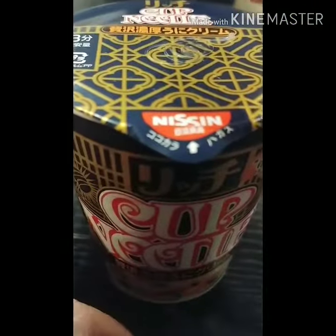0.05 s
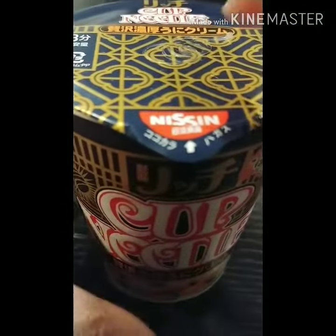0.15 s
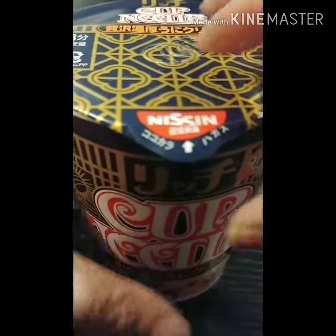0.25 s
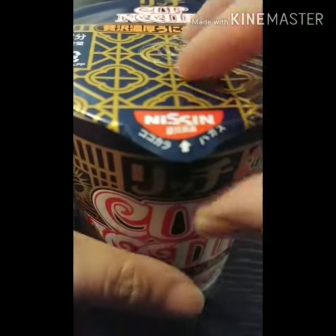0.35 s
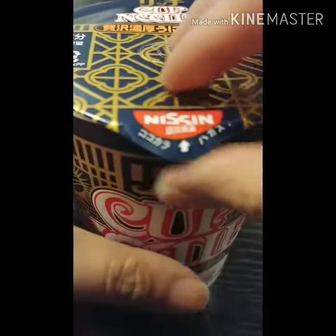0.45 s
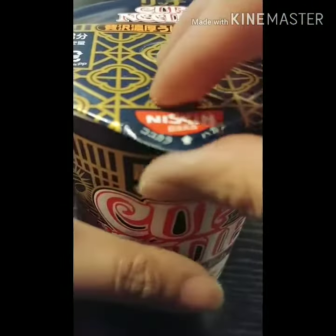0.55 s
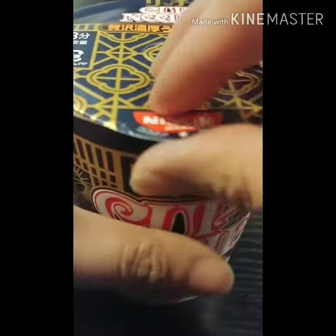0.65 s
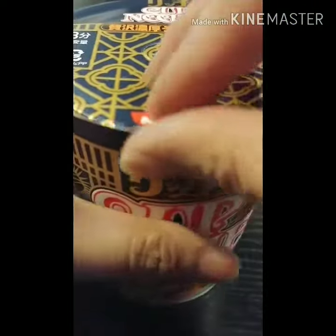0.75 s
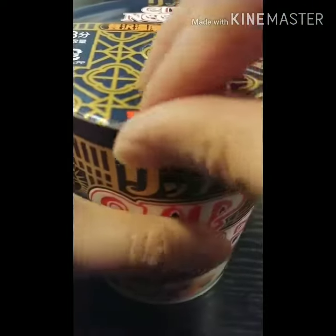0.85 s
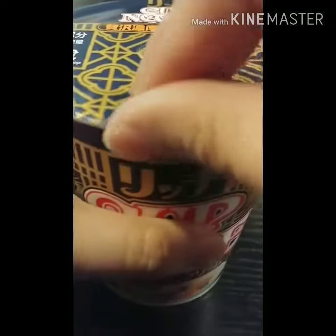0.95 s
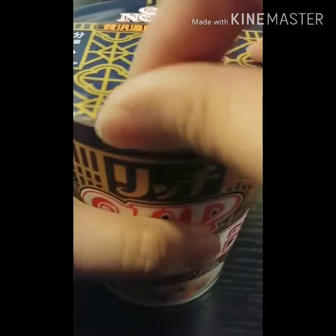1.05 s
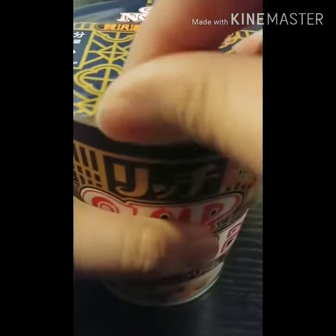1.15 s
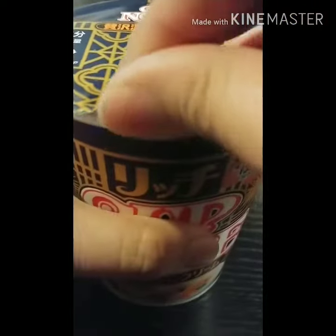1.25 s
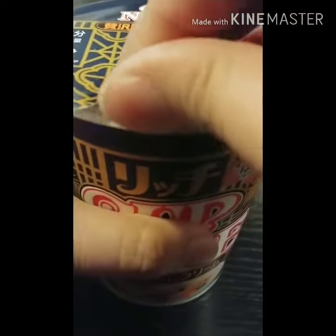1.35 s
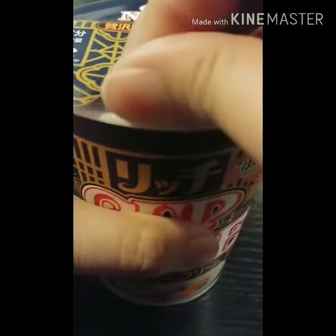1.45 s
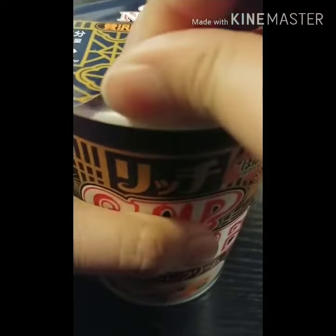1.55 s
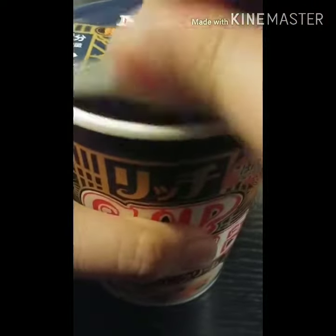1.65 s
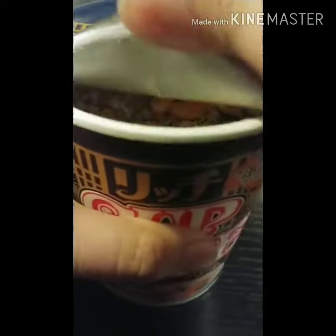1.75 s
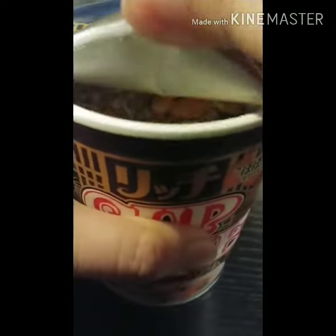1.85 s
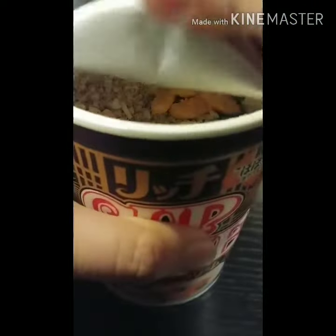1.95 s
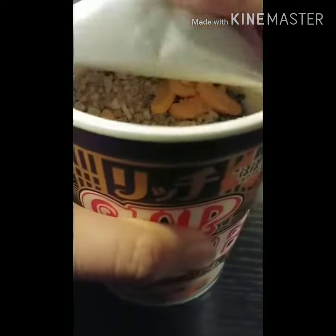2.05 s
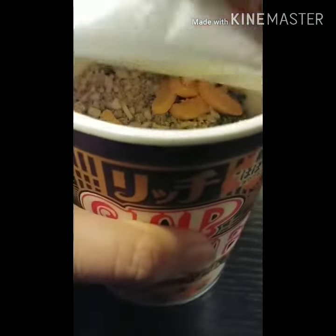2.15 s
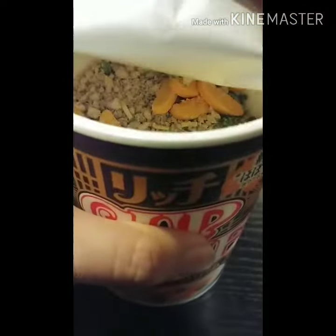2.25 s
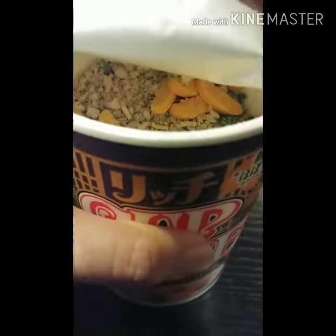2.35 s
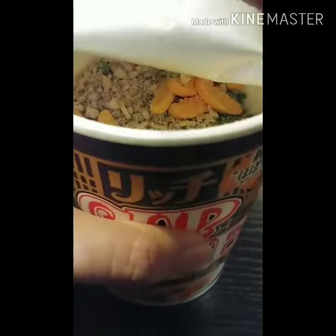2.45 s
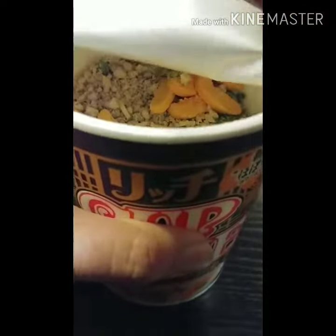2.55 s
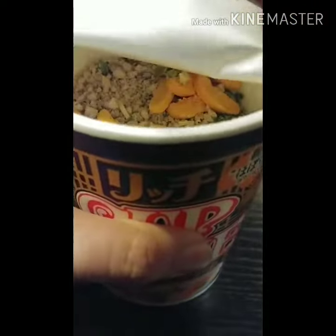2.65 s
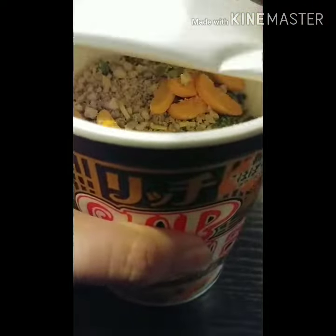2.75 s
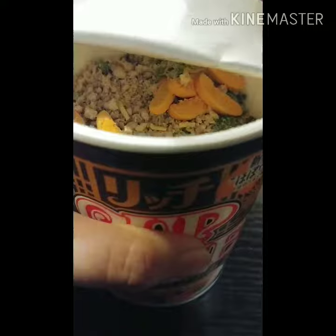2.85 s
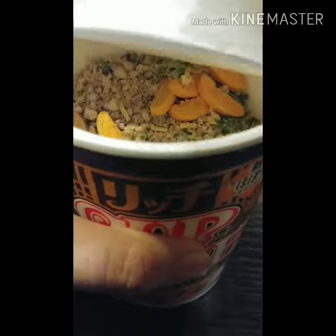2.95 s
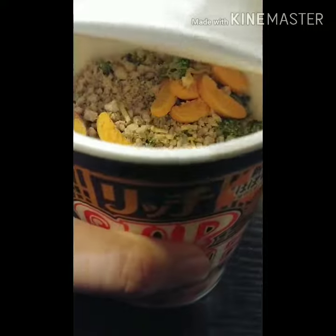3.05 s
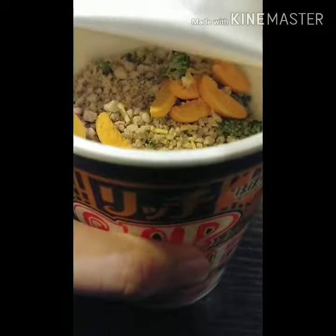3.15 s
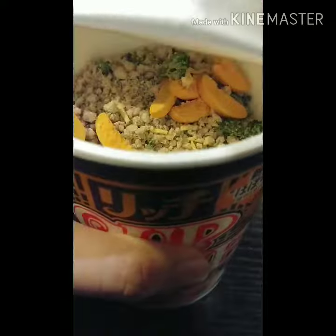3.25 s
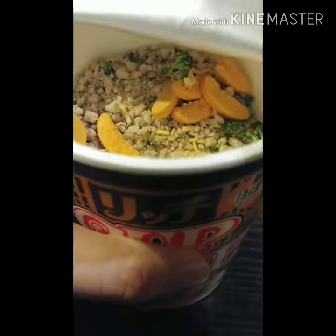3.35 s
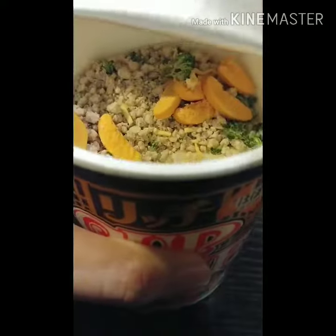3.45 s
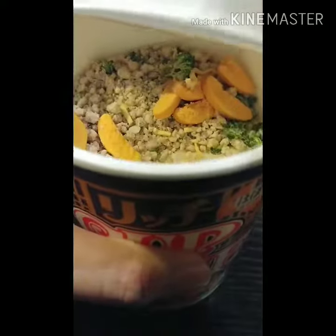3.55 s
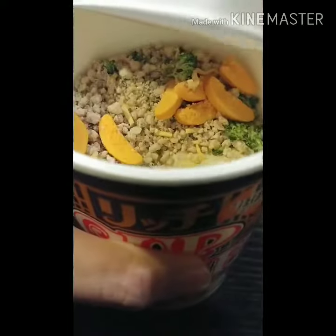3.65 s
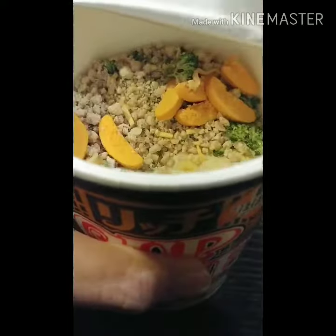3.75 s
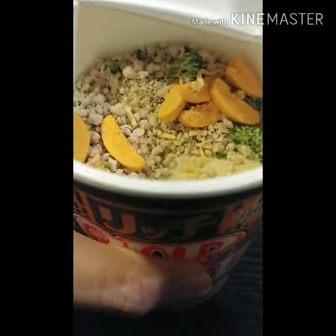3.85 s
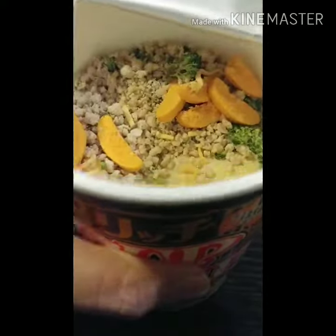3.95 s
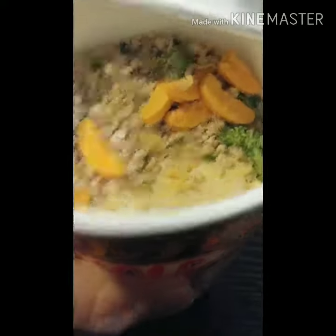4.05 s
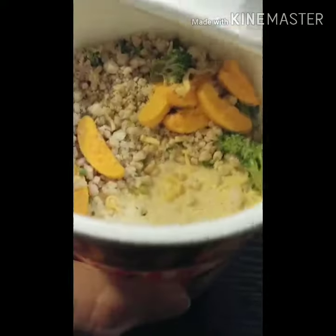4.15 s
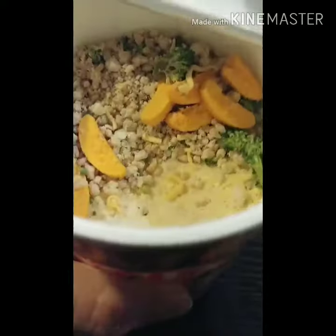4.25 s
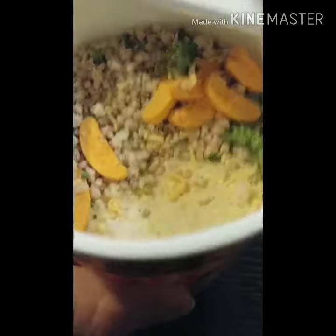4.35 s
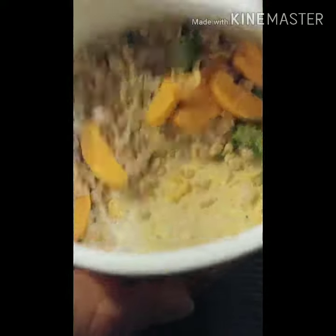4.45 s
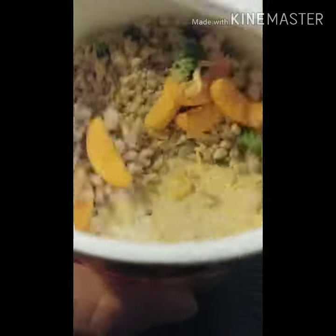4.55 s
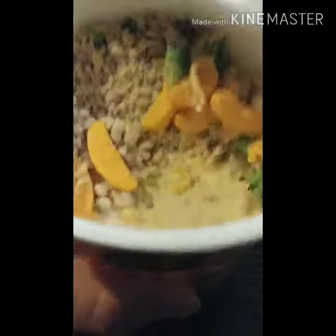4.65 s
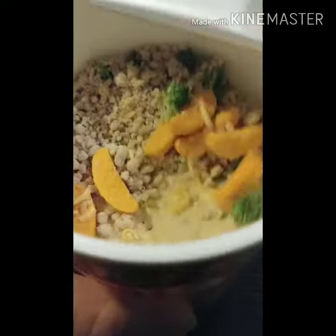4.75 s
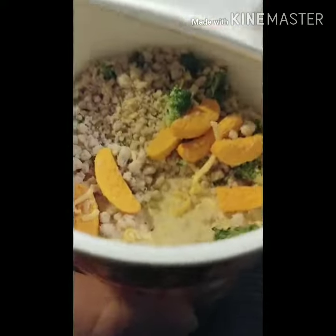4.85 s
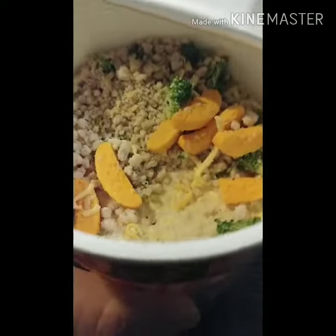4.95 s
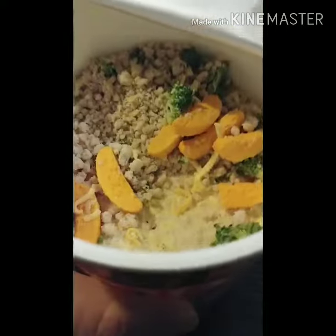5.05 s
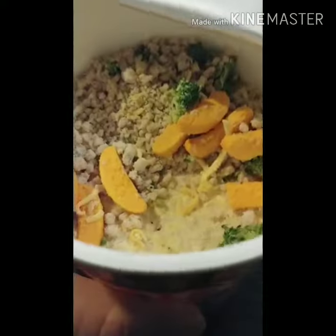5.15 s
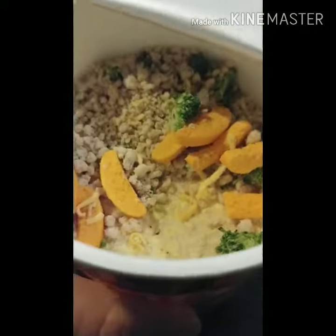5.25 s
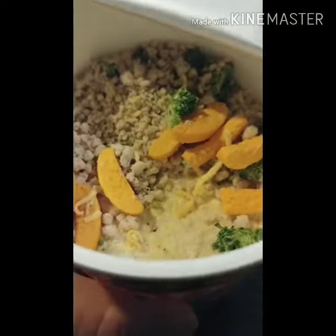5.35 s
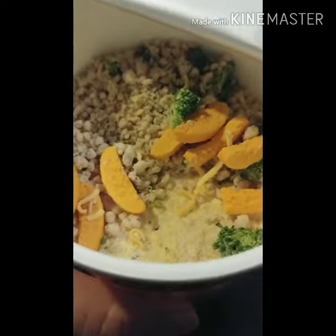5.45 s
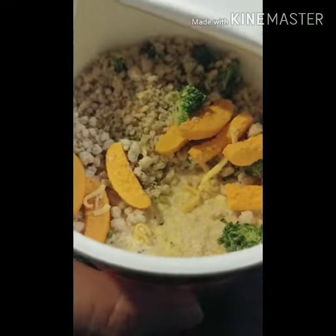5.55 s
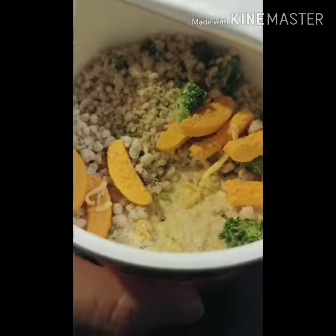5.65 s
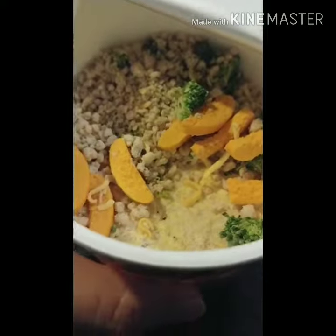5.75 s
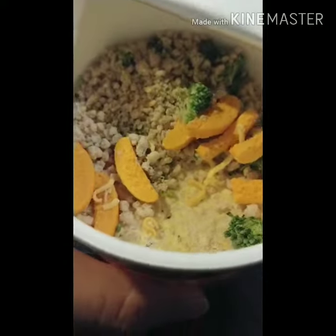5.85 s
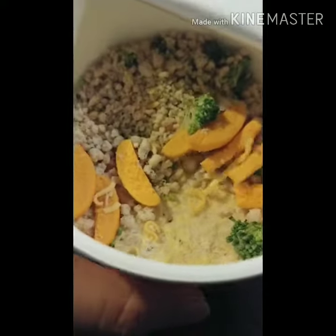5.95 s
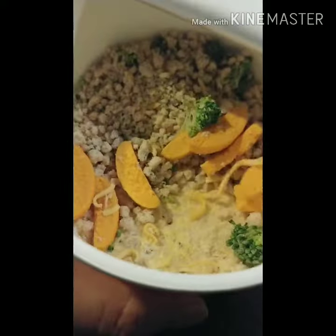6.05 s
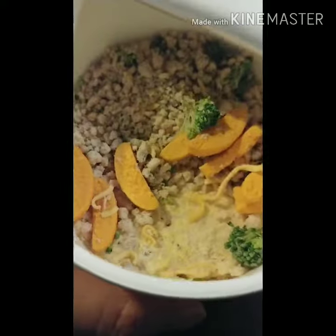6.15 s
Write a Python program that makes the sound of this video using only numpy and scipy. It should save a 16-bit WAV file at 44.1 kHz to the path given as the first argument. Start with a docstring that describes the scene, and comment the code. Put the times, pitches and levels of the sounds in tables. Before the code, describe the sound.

Close stereo phone pickup, quiet room with soft hiss and low handling rumble. A foil-lined paper lid is handled gently, then breaks free with a violent crack and dull thump. It bends and crackles, creaks in short even ticks, and snaps hard several more times while dry bits rattle inside the hollow cup. Finally only light finger rubs remain, shifted to the other side.

```python
"""Fingers work a paper and foil lid off a light cup close to a phone in a quiet room.
Over steady hush and hand rumble, filtered-noise rubs of the sheet begin, then modal knocks and lid bends.
Bursts of noise make the snaps from 1.1 s, loudest near 1.55 s, where ticking crumbs first tumble in the cup.
A gliding sine groans at 2.04 s, evenly spaced snaps creak from 3.17 s, and strong snaps return near 4, 4.4
and 5.1 s. Last, faint rubs move across the phone; two ports hear it all with different delay and colour."""
import sys
import numpy as np
from scipy import signal
from scipy.fft import rfft, irfft
from scipy.io import wavfile
from scipy.ndimage import uniform_filter1d

SR = 44100
rng = np.random.default_rng(int(sys.argv[2]) if len(sys.argv) > 2 else 0)


def log_audio(samples):
    """Write samples as a 16-bit WAV file to the path given in sys.argv[1]."""
    # one column per channel
    frames = np.atleast_2d(samples).T
    # limit to full scale, then quantise
    limited = np.clip(frames, -1, 1)
    pcm = np.round(limited * 32767).astype(np.int16)
    wavfile.write(sys.argv[1], SR, pcm)


N = 273331


def gain_of(db):
    """Decibel definition: amplitude ratio of a level."""
    return 10 ** (np.asarray(db) / 20)


def evened(x):
    """Normalisation to unit RMS."""
    return x / np.sqrt(np.mean(x ** 2) + 1e-20)


def read(points, hz):
    """Interpolation along a logarithmic frequency axis."""
    f, value = np.transpose(points)
    return np.interp(np.log(hz + 1), np.log(f + 1), value)


def curve(points):
    """Linear interpolation in time, at every sample."""
    return np.interp(np.arange(N) / SR, *np.transpose(points))


def add(mix, s, sound):
    """Superposition: adds a sound into the mix from time s."""
    part = mix[..., round(s * SR):][..., :sound.shape[-1]]
    part += sound[..., :part.shape[-1]]


def coloured(x, spectrum, lo_hz=0, hi_hz=1e5, modes=()):
    """Linear filtering: multiplies by a spectrum and its modes between two edges."""
    hz = np.fft.rfftfreq(x.shape[-1], 1 / SR) + 1
    edges = 1 / np.sqrt((1 + (lo_hz / hz) ** 90) * (1 + (hz / hi_hz) ** 60))
    rings = 1 + sum(gain_of(db) / (1 + 2j * (hz - f) / width) for f, width, db in modes)
    return irfft(rfft(x) * gain_of(read(spectrum, hz)) * edges * rings, x.shape[-1])


def resonate(x, hz, width_hz):
    """Heterodyne resonator: shifts the curve hz down to zero, smooths, and shifts back."""
    turn = np.exp(2j * np.pi * np.cumsum(hz * np.ones(x.shape[-1])) / SR)
    r = np.exp(-np.pi * width_hz / SR)
    smooth = signal.lfilter([1 - r], [1, -r], x / turn)
    return 2 * (turn * smooth).real


def twice(x, hz, width_hz):
    """Cascaded resonance: two passes steepen the skirts."""
    return evened(resonate(resonate(x, hz, width_hz), hz, width_hz))


def grains(per_s, spread_db, hiss):
    """Stick-slip friction: tiny slips of uneven size over a smooth rubbing hiss."""
    size = gain_of(spread_db * np.minimum(rng.exponential(1, N), 4))
    size = size * rng.choice([-1., 1.], N)
    slips = size * (rng.random(N) < per_s / SR)
    return evened(slips) + hiss * rng.standard_normal(N)


def patchy(x, patch_db):
    """Time-varying filtering: narrow patches of the spectrum swell and fade."""
    z = signal.stft(x, nperseg=512, noverlap=384)[2]
    patches = uniform_filter1d(rng.standard_normal(z.shape[1:]), size=3, axis=0)
    patches = uniform_filter1d(patches, size=24, axis=1)
    z = z * gain_of(patch_db * evened(patches))
    return signal.istft(z, nperseg=512, noverlap=384)[1][:, :N]


SLOPE_DB = 20  # rise and fall times of a stroke each span this many dB


def strokes(table):
    """Exponential envelopes: power of every row in steps of 32 samples; later columns are passed on."""
    s, rise, hold, fall, db, *columns = np.transpose(table)[..., None]
    t = np.arange(N // 32 + 2) * 32 / SR
    before, after = (s - t) / np.abs(rise), (t - s - hold) / np.abs(fall)
    away = np.maximum(np.maximum(before, after), 0)
    return gain_of(2 * np.maximum(db - SLOPE_DB * away, -200)), columns


def level(power, over_db=0):
    """Incoherent addition: strokes add in power."""
    return np.repeat(np.sqrt((power * gain_of(2 * over_db)).sum(0)), 32)[:N]


def ring(power, hz):
    """Power-weighted mean: the strongest stroke dominates the pitch."""
    return np.repeat((power * hz).sum(0) / power.sum(0), 32)[:N]


# spectrum of the hush: (frequency [Hz], level [dB per Hz])
HUSH = [(59, -30), (100, -8), (130, -16.5), (199, -12.5), (293, -20.5), (505, -27.5), (644, -26),
        (728, -28), (1540, -33.5), (1670, -33), (5400, -45.5), (11400, -52.5), (12600, -56.5), (16400, -81),
        (22000, -120)]
HUSH_DB = -67  # overall RMS level
# likeness of the two ports: (frequency [Hz], left-right correlation [-1 to 1])
HUSH_SAME = [(60, 0.98), (170, 0.95), (500, 0.49), (1460, -0.35), (4210, 0.36), (12200, 0.88)]


def hush():
    """Partially coherent noise field: room rumble and microphone hiss; the bass swells slowly."""
    a, b, c, d = rng.standard_normal((N // 256 + 5, 513, 4)).T
    hz, t = np.fft.rfftfreq(1024, 1 / SR), np.arange(a.shape[1]) * 256 / SR
    swell_hz = np.geomspace(.3, 5, 20)
    swell = evened(sum(np.sin(2 * np.pi * (f * t + rng.random())) for f in swell_hz))
    same = np.clip(read(HUSH_SAME, hz), -1, 1)[:, None]
    left = a + 1j * b
    right = same * left + np.sqrt(1 - same ** 2) * (c + 1j * d)
    swell_db = 4.5 * swell / (1 + (hz[:, None] / 300) ** 2)
    z = np.array([left, right]) * gain_of(read(HUSH, hz)[:, None] + swell_db)
    return gain_of(HUSH_DB) * evened(signal.istft(z, nperseg=1024, noverlap=768)[1][:, :N])


# hand on the phone: (time [s], level [dB])
RUMBLE = [(0.0, -85), (0.3, -74), (0.6, -70), (1.5, -69.5), (2.43, -66), (3.19, -59.5), (3.35, -68),
          (3.81, -75.5), (4.41, -58.5), (5.09, -70.5), (5.84, -61), (6.2, -64)]
# spectrum of the hand's shaking: (frequency [Hz], level [dB per Hz])
HAND = [(12, -40.5), (20, -2), (59, 6), (114, -7), (150, -12), (200, -45), (330, -120)]


def rumble():
    """Structure-borne noise: the holding hand shakes the phone, partly alike in both ports."""
    noise = rng.standard_normal(N) + 2.3 * rng.standard_normal((2, N))
    return gain_of(curve(RUMBLE)) * evened(coloured(noise, HAND))


# fingers rubbing and bending the sheet: (time [s], rise [s], hold [s], fall [s], fold rustle [dB],
# fold ring [Hz], foil sizzle over the fold [dB], fine fizz over the fold [dB])
RUBS = [(.13, .05, 0.048, 0.032, -75.5, 2630, -4.5, -8), (.31, 0.025, 0.03, .1, -62.5, 2660, 0, 1.5),
        (.36, 0.12, 0.096, .4, -60.5, 2600, -2.5, -6), (.676, .2, 0.0041, 0.062, -60, 2850, -1, -5.5),
        (.784, .08, 0.004, 0.087, -56.5, 2710, -1, -9.5), (.84, .1, 0.43, .1, -62.5, 2700, -5.5, -8),
        (1.18, 0.093, .18, 0.13, -61, 2100, -1, -7.5), (1.43, .1, .1, .02, -65.5, 2600, -10, -15.5),
        (1.558, 0.02, 0.039, 0.036, -37, 2350, -5, -15), (1.634, .02, 0.0038, .15, -56.5, 2200, -6, -15.5),
        (1.85, .05, 0.022, 0.049, -50, 2080, -10.5, -17), (2.072, 0.15, .005, .08, -54.5, 2550, -11, -13),
        (2.192, .007, .005, .12, -50, 2730, -18, -13.5), (2.286, 0.066, .005, 0.079, -42.5, 2980, -2, -6.5),
        (2.384, .01, 0.046, 0.034, -49, 2610, -8, -19), (2.48, 0.0089, 0.02, 0.041, -66, 2595, -9, -16.5),
        (2.574, .025, .005, 0.091, -61, 2600, -10, -18), (2.752, 0.067, .1, .1, -63, 2400, -49.5, -19),
        (2.975, 0.2, .005, 0.017, -50, 2500, -10, -10.5),
        (3.0, 0.026, 0.061, 0.082, -60.5, 2550, -4.5, -10), (3.16, .02, .2, 0.044, -63, 2430, -16, -11),
        (3.54, .1, .18, 0.032, -57, 2500, -16, -12.5), (3.818, .005, .03, .1, -63, 2340, -4.5, -9.5),
        (4.0, 0.0032, 0.0046, 0.071, -47.5, 2220, -4, -17), (4.128, .015, 0.0027, 0.024, -59, 3250, -1, -2),
        (4.38, 0.064, .005, 0.022, -58, 2500, -7.5, -11), (4.4, 0.0052, 0.004, 0.069, -46.5, 1950, -5, -15),
        (4.51, .05, 0.0039, .046, -39.5, 2600, -9, -9), (4.634, .1, .005, 0.15, -63, 2500, 0, -6.5),
        (4.85, 0.097, 0.0046, .043, -64, 2050, -8, -11),
        (5.103, .005, 0.0021, .015, -47, 2130, -22.5, -13.5),
        (5.12, .01, 0.046, .06, -63, 2100, -4.5, -17.5),
        (5.255, 0.021, 0.0041, .04, -65.5, 2460, -9.5, -15.5), (5.32, .008, .08, 0.13, -81, 2835, 19.5, 7),
        (5.43, .1, 0.094, 0.054, -74.5, 3415, 18, 4), (5.596, 0.049, 0.032, 0.027, -74.5, 3150, 5, -3.5),
        (5.688, .03, 0.037, 0.052, -71, 2900, 8.5, -4),
        (5.948, 0.023, 0.0037, 0.037, -72.5, 2700, -1, -4.5),
        (6.022, .025, 0.0057, 0.0895, -79, 2500, 4, -6)]
# broad colour of the sheet: (frequency [Hz], level [dB per Hz])
SHEET = [(410, -31), (700, -16.5), (983, -10.5), (1960, -2.5), (2270, -7), (2960, -1), (5900, -11.5),
         (7980, -12.5), (12600, -38.5), (16400, -79), (22000, -120)]
# modes of the sheet: (frequency [Hz], width [Hz], level over the broad colour [dB])
FOIL = [(1950, 62, 10), (2490, 46, 1.5), (2750, 360, 6.5), (3080, 160, -6), (4110, 270, 6.5),
        (4457, 330, 15), (5250, 230, -4), (6530, 100, 5), (7200, 470, 2.5), (9400, 2800, -4)]
# fold, foil and fizz ranges of the sheet: (low edge [Hz], high edge [Hz])
BANDS = [(1150, 3750), (3880, 4950), (5000, 13000)]
# where the rustle sits: (time [s], left-right difference [dB])
PLACE = [(0, 4), (1.1, 0.5), (1.6, 1.5), (2.3, 3.5), (3.0, 0), (3.8, -2.5), (4.05, 2.5), (4.4, 0.5),
         (4.7, 0), (5.1, -5.5), (5.7, -8), (6.2, -4)]


def sides(pan_db):
    """Interaural level difference: half the difference goes to each side."""
    return gain_of(np.multiply.outer([.5, -.5], pan_db))


def rustle():
    """Friction-driven plate modes: slips excite folds, foil and fizz, partly from scattered spots."""
    power, (hz, foil_db, fizz_db) = strokes(RUBS)
    shared = grains(1200, 2.6, 1.0)
    scattered = np.array([grains(1600, 2.7, 0.89), grains(2500, 3.6, 0.54)])
    slips = patchy(shared + 1.7 * scattered, 3.16)
    fold, foil, fizz = (evened(coloured(slips, SHEET, *band, modes=FOIL)) for band in BANDS)
    fold_ring = np.array([twice(side, ring(power, hz), 450) for side in slips])
    fold = evened(fold + 0.44 * fold_ring)
    sheet = level(power) * fold + level(power, foil_db) * foil + level(power, fizz_db) * fizz
    return sides(curve(PLACE)) * sheet


# thumps of lid and cup: (time [s], peak level [dB], lid ring [Hz], lid t60 [s],
# cup ring over the lid ring [dB])
KNOCKS = [(0.235, -45.5, 568, 0.053, 2.5), (1.017, -53.5, 396.6, 0.17, -1), (1.5506, -9.5, 137, 0.016, -14),
          (1.585, -28, 684, 0.052, 0.5), (1.87, -42.5, 314, 0.16, -9), (1.995, -40, 313, 0.17, -17),
          (2.051, -33, 298, 0.028, -21), (2.188, -38.5, 196, 0.12, -23), (2.252, -45.5, 717, 0.026, -16),
          (2.283, -46, 620, 0.088, -7), (2.392, -54, 232, 0.19, 0), (2.573, -40.5, 277, 0.075, -9),
          (2.593, -45, 265, 0.14, -8), (2.895, -44.5, 289, 0.11, 2.5), (3.02, -43.5, 346, 0.08, 7),
          (3.152, -50, 391, .07, 2.5), (3.209, -34.5, 380, 0.074, -13.5), (3.272, -31.5, 381, 0.066, -17),
          (3.308, -29, 388, 0.043, -18), (3.337, -43.5, 402, 0.036, -6.5), (3.666, -36.5, 337.6, 0.12, -10),
          (3.689, -47.5, 301, 0.088, 4), (3.9906, -19, 327, 0.048, 1.5), (4.403, -40.5, 322, 0.2, -8),
          (4.494, -36.5, 812, 0.13, -3), (5.095, -15.5, 314.7, 0.047, -3), (5.183, -38.5, 327.3, 0.3, 0)]
# modes of the cup: (nominal frequency [Hz], relative level [dB], t60 [s])
CUP = [(71.4, -7, 0.11), (158.7, -8, 0.19), (196, -1.5, .06), (304.7, -5.5, 0.1), (440, -5, 0.041),
       (533, 4.5, 0.028), (591.3, -10, 0.11), (668, -7.5, 0.063), (793, -5.5, 0.07), (980, -12, 0.1),
       (1160, -21.5, 0.23), (1316, -26.5, 0.11), (1590, -21.5, 0.027), (2060, -24, .04)]
PUSH_S, PUSH_HZ = 0.0045, 330  # rise time of a lid ring at this pitch; higher rings start faster
CUP_DETUNE = .03  # the grip detunes each cup mode by this fraction, as a standard deviation


def knocks():
    """Modal impact response: a soft push rings the lid; an uneven shudder shakes the cup's modes."""
    out, t = np.zeros(N), np.arange(16000) / SR
    for (s, db, hz, t60, cup_db), noise in zip(KNOCKS, rng.standard_normal((len(KNOCKS), 2000))):
        rise = PUSH_S * np.sqrt(PUSH_HZ / hz)
        cup = 0
        for (f, mode_db, ring_s), grip in zip(CUP, noise[::-1]):
            held_hz = f * (1 + CUP_DETUNE * grip)
            cup = cup + gain_of(mode_db - 60 * t / ring_s) * np.sin(2 * np.pi * held_hz * t)
        lid = -gain_of(-60 * t / t60) * np.sin(2 * np.pi * hz * t) * (1 - np.exp(-(t / rise) ** 2))
        shaking = noise * gain_of(-60 * t[:len(noise)] / 0.011)
        shudder = signal.oaconvolve(cup, shaking)[:len(t)]
        shaken = (evened(cup) + 0.61 * evened(shudder)) * (1 - np.exp(-t / (0.49 * rise)))
        lid, shaken = lid / np.abs(lid).max(), shaken / np.abs(shaken).max()
        add(out, s, gain_of(db) * (lid + gain_of(cup_db) * shaken))
    return out


# lid and wall bending under the fingers: (time [s], rise [s], hold [s], fall [s], lid level [dB],
# lid ring [Hz], wall level over the lid [dB], wall ring [Hz])
BENDS = [(.248, .02, .1, .2, -62.5, 400, 1.5, 658.4), (.402, 0.066, 0.0061, .08, -54.5, 490, -7, 634),
         (.5, 0.087, 0.5, .1, -75, 280, 6.5, 801), (1.026, 0.18, 0.0065, .15, -59.5, 410, 0.5, 691),
         (1.174, 0.12, 0.092, .16, -45.5, 496.6, -5, 630), (1.35, .1, 0.22, .02, -58.5, 467, 1.5, 1150),
         (1.568, 0.011, .003, .035, -28, 236, -2, 665), (1.6, 0.022, 0.009, .12, -43.5, 311, -4, 674),
         (1.88, .086, 0.0035, .03, -43, 335, -8.5, 601), (2.0, 0.0046, .02, 0.09, -55, 315, -2, 605.6),
         (2.056, .005, 0.0089, .05, -54, 289, 2, 635), (2.088, 0.1, .005, .065, -45.5, 246, -4.5, 691),
         (2.194, .01, 0.0032, .06, -57, 206.5, 10, 629), (2.264, .05, 0.15, .4, -60.5, 279.2, -5, 680),
         (2.592, 0.05, 0.0061, .073, -51, 261.2, -21.5, 618),
         (2.928, 0.25, 0.0037, .3, -52.5, 297.7, -3.5, 655), (3.024, .04, .005, .1, -45, 370.5, -4, 795),
         (3.158, .015, 0.0023, .02, -47.5, 368.4, -27.5, 739),
         (3.216, .02, .003, .03, -59.5, 382, -16.5, 658),
         (3.318, 0.083, 0.0055, .05, -45, 372.6, -14.5, 641),
         (3.556, 0.11, 0.004, .11, -45, 344.6, -23, 638), (3.69, .12, .005, .047, -48, 340, -23, 651),
         (3.92, 0.58, .005, .1, -67.5, 293.4, -2.5, 750), (4.022, 0.006, .035, .13, -41, 297.3, -6, 671),
         (4.402, .01, 0.0038, .05, -46, 253, -3, 1165), (4.44, .02, 0.025, .1, -61.5, 230, -8.5, 1090),
         (4.504, 0.0088, 0.0037, .034, -68, 463, 19, 809), (4.638, 0.064, .005, .08, -74.5, 462, 23, 778),
         (4.734, 0.089, 0.004, .2, -67.5, 184, 3.5, 860), (5.128, .01, .005, .08, -38.5, 282, 0.5, 735),
         (5.2, 0.026, 0.0031, .07, -48, 319, -3.5, 635), (5.276, .05, .005, .075, -55.5, 325, -4.5, 690)]
# fixed modes of the wall: (frequency [Hz], width [Hz], relative level [dB])
WALL = [(619, 91, 11.5), (877, 550, 10.5), (996, 400, -10), (1470, 220, -5.5)]


def flex():
    """Flexural resonance: finger slips drive rings that follow the bend, over the wall's fixed modes."""
    power, (lid_hz, wall_db, wall_hz) = strokes(BENDS)
    lid_hz, wall_hz = ring(power, lid_hz), ring(power * gain_of(2 * wall_db), wall_hz)
    slips = grains(230, 3.3, 0.8) + 0.43 * rng.standard_normal((2, N))
    lid = twice(slips, lid_hz, 110) + .6 * twice(slips, 400, 250)
    wall = evened(sum(gain_of(db) * twice(slips, hz, width) for hz, width, db in WALL))
    wall = evened(wall + 1.4 * twice(slips, wall_hz, 160))
    return level(power) * evened(lid) + level(power, wall_db) * wall


# creases and glue letting go: (time [s], peak level [dB], ring [Hz], tilt [dB per octave])
SNAPS = [(1.1465, -45, 2620, -16), (1.178, -46.5, 1200, -12.5), (1.452, -47, 2600, -5), (1.5, -46, 2850, 4),
         (1.5467, -8.5, 3060, -7.5), (1.5494, -8, 2306, -0.5), (1.6624, -36.5, 4270, -1),
         (1.6734, -45, 3980, 0), (1.843, -40, 1790, 3), (1.9256, -53.5, 3120, 10), (2.191, -38, 2760, 1),
         (2.288, -21.5, 3130, 0), (2.352, -33.5, 3200, 3), (2.383, -30, 2645, -4.5),
         (2.8053, -48.5, 2660, 14), (2.9424, -45, 2430, 21), (2.9739, -29.5, 4480, 9),
         (3.0431, -26.5, 4700, 5), (3.0557, -34.5, 2540, -5), (3.494, -35, 2420, -5.5),
         (3.6485, -37, 2060, -4), (3.8166, -38, 2170, -6), (3.843, -42.5, 2100, -3),
         (3.9909, -13.5, 4400, 0.5), (4.079, -46, 2060, 10.5), (4.126, -37.5, 3930, 17),
         (4.238, -51, 4660, 18), (4.363, -37, 2640, -3), (4.3922, -15.5, 4000, -2.5),
         (4.394, -22, 1820, -5.5), (4.4696, -23.5, 2460, 3.5), (4.4936, -24.5, 7600, -5),
         (4.4855, -46, 2500, -4), (4.498, -23, 2630, -7.5), (4.511, -21.5, 3000, -11.5),
         (4.5234, -25.5, 4000, -8), (4.581, -40.5, 2560, 6), (4.6229, -37.5, 3020, -14),
         (4.6337, -33, 1620, -0.5), (4.643, -31, 2900, -1), (4.707, -39, 2000, .5), (4.7592, -44, 1520, 1),
         (4.7935, -45, 1710, -14.5), (4.835, -43.5, 1860, -3), (5.0943, -15.5, 4640, 0.5),
         (5.1633, -36, 1970, -4.5), (5.2497, -41.5, 2047, -6), (5.951, -55, 4050, 25),
         (6.0216, -48.5, 4110, -6), (6.0561, -52, 2120, 0.5)]
SNAP_TICK = 4.1  # the clean tick that starts a snap, against its rough tail
# t60 of a -30 dB snap: this time [s] plus so many ring cycles; growth is dB longer per dB louder
SNAP_T60_S, SNAP_CYCLES, SNAP_GROWTH = .004, 16, 0.09


def snaps():
    """Impulsive excitation: a short dying burst rings sheet and crease, a little differently per port."""
    out, t = np.zeros((2, N)), np.arange(-200, 2800) / SR
    rows = [*SNAPS, *creaks()]
    for (s, db, hz, tilt_db), noise in zip(rows, rng.standard_normal((len(rows), 3, len(t)))):
        t60 = (SNAP_T60_S + SNAP_CYCLES / hz) * 10 ** (SNAP_GROWTH * (db + 30) / 20)
        envelope = gain_of(-60 * np.abs(t) / t60) * (1 - np.exp(-np.maximum(t, 0) / 0.002))
        burst = (noise[0] + 1.8 * noise[1:]) * envelope + SNAP_TICK * (t == 0)
        burst = coloured(burst, [(500, -2 * tilt_db), (8000, 2 * tilt_db)])  # four octaves
        crease = np.array([twice(side, hz, 450) for side in burst])
        sound = evened(coloured(burst, SHEET, modes=FOIL)) + 0.75 * crease
        add(out, s + t[0], gain_of(db) * sound / np.abs(sound).max())
    return out


# dry crumbs tumbling against the wall: (time [s], rise [s], hold [s], fall [s], level [dB])
TUMBLES = [(1.553, .005, 0.058, 0.055, -49.5), (3.996, 0.005, 0.0063, 0.066, -47.5),
           (5.1, .004, 0.01, 0.063, -44), (4.41, 0.011, 0.022, 0.17, -53),
           (4.5, 0.022, 0.016, 0.063, -43.5), (4.63, 0.07, 0.11, 0.1, -55.5),
           (4.8, 0.13, 0.058, 0.027, -63.5)]
# colour of the crumbs: (frequency [Hz], level [dB per Hz])
CRUMB = [(300, -29), (600, -3.5), (900, -3.5), (1400, 0), (2100, -5.5), (3000, -24), (5000, -17.5),
         (12000, -48)]


def tumble():
    """Granular impact noise: many small hard grains, each a tick that rings for a moment."""
    scattered = np.array([grains(500, 4.0, .3), grains(600, 4.0, .3)])
    ticks = grains(500, 7.1, 0.283) + .5 * scattered
    return level(strokes(TUMBLES)[0]) * evened(coloured(patchy(ticks, 2.8), CRUMB))


# the lid sags and its ring slides down: (time [s], frequency [Hz], level [dB])
GROAN = [(2.041, 288, -68), (2.06, 288.5, -43.5), (2.112, 164, -48), (2.148, 174, -60), (2.155, 175, -76)]


def groan():
    """Frequency modulation by phase integration: a single clean ring that glides."""
    s, hz, db = np.transpose(GROAN)
    t, out = np.arange(s[0], s[-1], 1 / SR), np.zeros(N)
    tone = np.sqrt(2) * np.sin(2 * np.pi * np.cumsum(np.interp(t, s, hz)) / SR)
    add(out, s[0], gain_of(np.interp(t, s, db)) * tone * signal.windows.tukey(len(t), .2))
    return out


# runs of near-even small snaps: (first time [s], last time [s], rate [snaps per s], peak level [dB],
# ring [Hz], tilt [dB per octave])
CREAKS = [(3.17, 3.354, 43.4, -42, 2500, -1), (3.528, 3.72, 49, -45, 2050, -2)]
# standard deviations of time [s], level [dB] and log pitch
CREAK_JITTER_S, CREAK_SPREAD_DB, CREAK_DETUNE = .0015, 2, .08


def creaks():
    """Quasi-periodic stick-slip: a row of snaps, slightly uneven in time, size and ring."""
    rows = []
    for first, last, per_s, db, hz, tilt_db in CREAKS:
        late, size, pitch = rng.standard_normal((20, 3)).T
        s = first + np.arange(20) / per_s + CREAK_JITTER_S * late
        peak_db, ring_hz = db + CREAK_SPREAD_DB * size, hz * np.exp(CREAK_DETUNE * pitch)
        run = np.transpose([s, peak_db, ring_hz, tilt_db + 0 * s])
        rows += run[s < last + .5 / per_s].tolist()
    return rows


# reverberation of the room: (frequency [Hz], t60 [s])
ROOM = [(150, 0.36), (500, 0.69), (2000, 0.061), (8000, 0.12)]


def room(x):
    """Statistical reverberation: sparse taps of random sign, each band dying at its own speed."""
    taps = np.zeros((2, SR // 2))
    at = np.arange(150, SR // 2 - 20, 20) + rng.integers(0, 20, (2, (SR // 2 - 151) // 20))
    np.put_along_axis(taps, at, rng.choice([-1., 1.], at.shape), 1)
    hz, t, z = signal.stft(taps, SR, nperseg=256)
    decay = gain_of(-60 * t / read(ROOM, hz)[:, None])
    tail = signal.istft(z * decay, SR, nperseg=256)[1]
    return signal.fftconvolve(x, tail / np.linalg.norm(tail[0]), axes=1)[:, :N]


# phase between the ports at turn 1: (frequency [Hz], lead of the left port [rad])
LEAD = [(0, 0), (300, .5), (690, 0.9), (1210, 2.9), (1720, 3.2), (2240, 4.7), (2580, 4.6), (4220, 8.1),
        (6290, 14.4), (7150, 15.4), (8870, 22.7), (11000, 29.1), (12400, 36.4)]
# shadow between the ports: (frequency [Hz], left-right difference [dB])
TILT = [(60, -9.5), (130, 6), (270, 3), (590, 0.5), (1250, -10), (2670, -6), (5710, -7), (12200, 7.5)]


def ports(x, turn=1):
    """Two-receiver diffraction: each port has its own delay and shadow; a negative turn leads right."""
    hz = np.fft.rfftfreq(N, 1 / SR)
    phase = turn * np.interp(hz, *np.transpose(LEAD))
    left = gain_of(read(TILT, hz) / 2) * np.exp(.5j * phase)
    pair = np.array([left, 1 / left])
    return irfft(rfft(x) * pair / np.sqrt(np.mean(np.abs(pair) ** 2, 0)), N)


OTHER_SIDE_S = 5.295  # from here on the rubbing is across the phone, and the right port leads


def scene():
    """Superposition of direct sound, its reverberation and the background."""
    rubbing, early = rustle(), np.arange(N) < OTHER_SIDE_S * SR
    near = early * rubbing + flex() + groan() + snaps() + knocks() + tumble()
    across = ports(~early * rubbing, -0.79)
    reverberant = gain_of(-27.0) * room(near + across)
    return ports(near + reverberant) + across + hush() + rumble()


EDGE_HZ = 12400  # upper band limit


def record(dry):
    """Band-pass transduction: the microphone loses the deepest bass; then the band limit."""
    thinned = signal.sosfilt(signal.butter(2, 40, "high", fs=SR, output="sos"), dry)
    band_limit = signal.firwin(255, EDGE_HZ, window=("kaiser", 6), fs=SR)
    return signal.oaconvolve(thinned, band_limit[None], "same")


dry = scene()
out = record(dry)
log_audio(out)
```